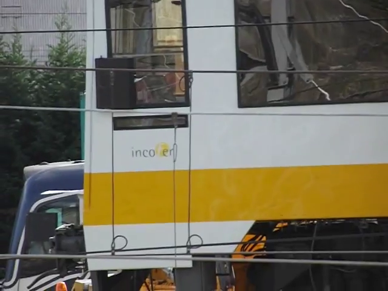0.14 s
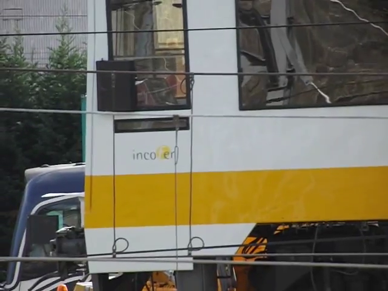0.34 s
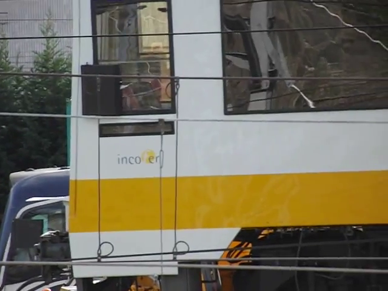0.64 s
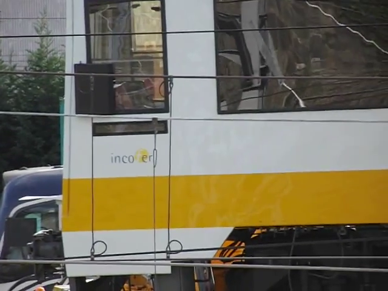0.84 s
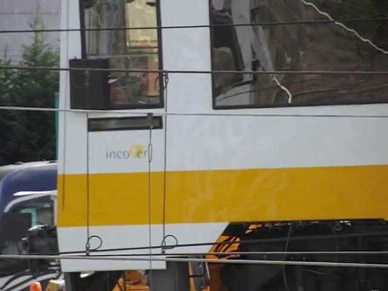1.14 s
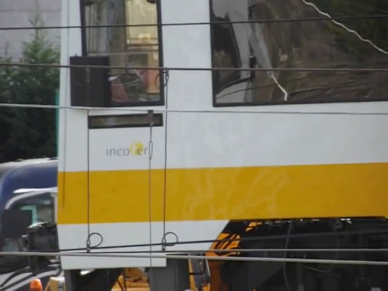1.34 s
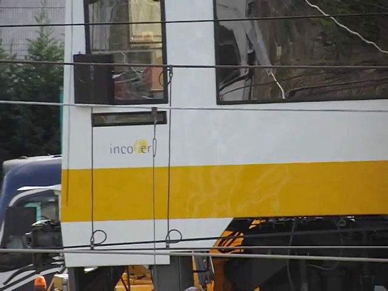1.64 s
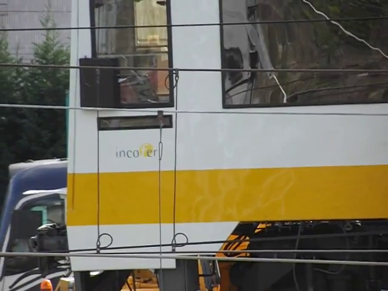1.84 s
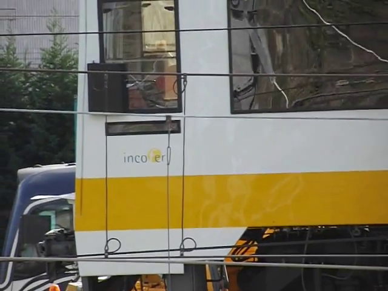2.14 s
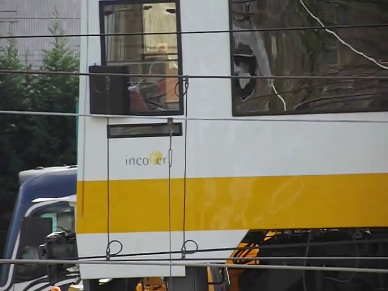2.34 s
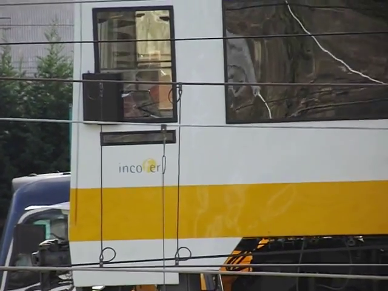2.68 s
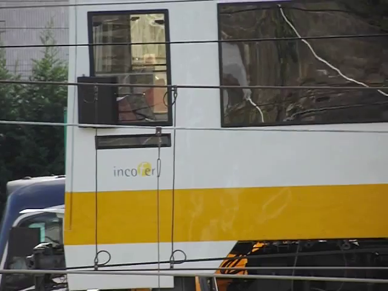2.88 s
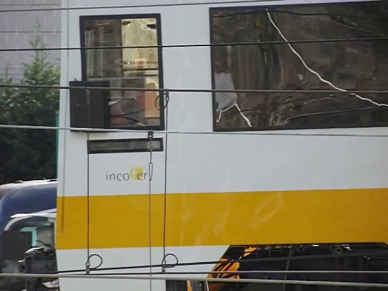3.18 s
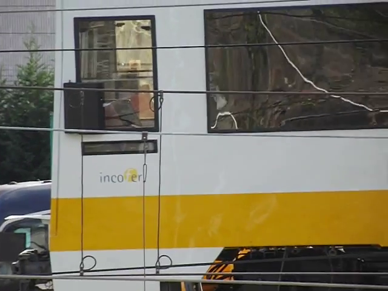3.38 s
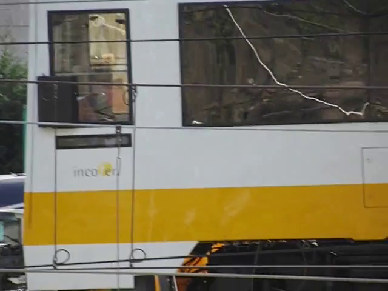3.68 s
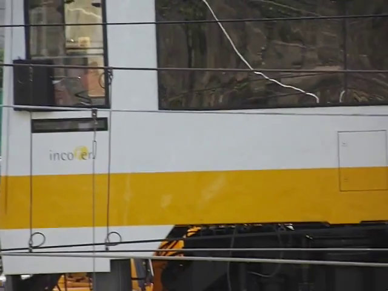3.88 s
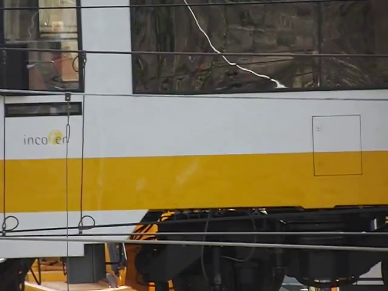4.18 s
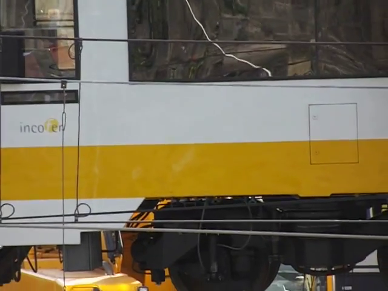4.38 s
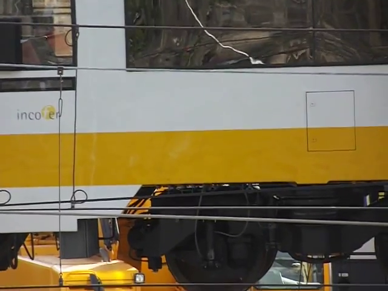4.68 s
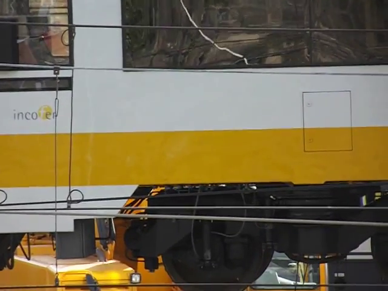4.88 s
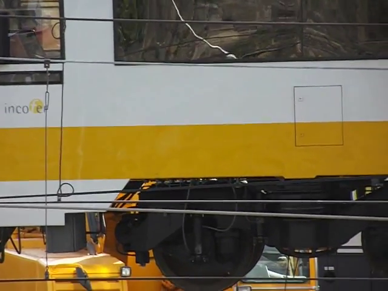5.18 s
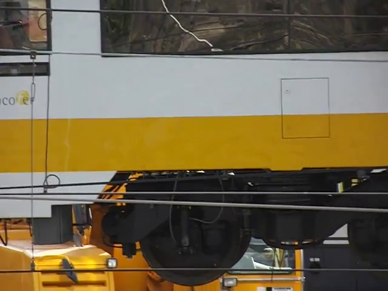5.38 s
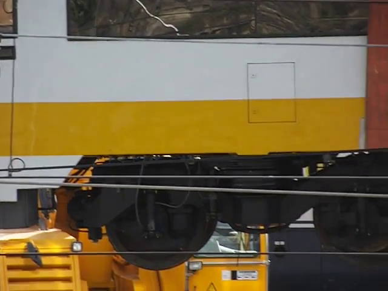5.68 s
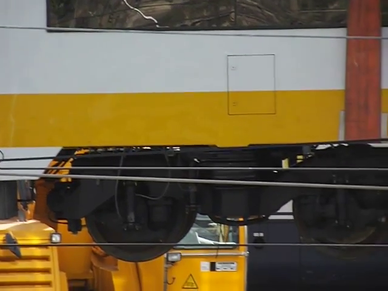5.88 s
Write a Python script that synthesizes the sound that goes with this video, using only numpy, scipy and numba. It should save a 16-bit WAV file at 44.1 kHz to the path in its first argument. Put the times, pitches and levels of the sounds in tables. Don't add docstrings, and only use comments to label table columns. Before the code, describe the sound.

A heavy diesel crane engine roars steadily outdoors while wind thumps the microphone, small metal rattles, then steel scrapes and groans in waves.

```python
import sys
import numpy as np
from scipy import signal
from scipy.fft import rfft, irfft
from scipy.io import wavfile
from scipy.ndimage import uniform_filter1d
from numba import njit

SR = 44100
rng = np.random.default_rng(int(sys.argv[2]) if len(sys.argv) > 2 else 0)


def int16_out(signal):
    q = np.round(np.clip(np.atleast_2d(signal).T, -1, 1) * 32767)
    wavfile.write(sys.argv[1], SR, q.astype(np.int16))


def ratio(d):
    e = np.asarray(d, float) / 20
    return 10 ** e


N = 265482
T = np.arange(N) / SR

FIRING_HZ, FIRING_DB = 38.5, -39
ROAR_DB = -31.5
DRAG_MASK_DB = -38.5
YARD_T60_S, YARD_DB = 0.61, -10

# multiple_of_firing_rate [1], level_db [dB re FIRING_DB]
EXHAUST_HARMONICS = [
    (1, 3),
    (2, -13),
    (6, -19),
    (7, -9.5),
]
# start_s [s], piston_rate_hz [Hz], level_db [dB]
PUMP_COURSE = [
    (0, 178.4, -38),
    (1, 178, -37.5),
    (2.2, 176.5, -38.5),
    (3.1, 174.9, -42),
    (4, 174.4, -40.5),
    (4.7, 170, -43.5),
    (5.4, 170, -48.5),
    (6.02, 171.5, -39.5),
]
# frequency_hz [Hz], density_db [dB per Hz]
ROAR_SPECTRUM = [(50, -1), (120, -5.5), (220, -3), (400, -7), (470, -10), (580, -13.5), (700, -10.5),
                 (1250, -12.5), (2000, -17), (2500, -14.5), (3200, -17), (4000, -18.5), (5000, -31.5),
                 (7000, -51.5)]
# pitch_hz [Hz], width_hz [Hz], level_db [dB]
PANEL_MODES = [(856, 210, -41), (1028, 255, -43.5), (2750, 220, -45), (2805, 20, -54.5), (3604, 200, -50),
               (340.3, 25, -50)]
# start_s [s], panel_level_db [dB]
ENGINE_LOAD = [(0, -3.5), (.5, -0.5), (1.0, 3.5), (1.4, 3.5), (1.8, -1.5), (2.5, 2.5), (3.0, -0.5),
               (4.2, 1), (4.7, -1.5), (5.1, 4), (5.6, 3), (6.02, 1.5)]
# start_s [s], level_db [dB, with the roar], brightness_db [dB per octave]
DRAG_COURSE = [(1.9, -46.5, 6), (1.94, -33, -3.5), (1.99, -42, 7), (2.01, -30.5, -5), (2.03, -35.5, -1.5),
               (2.22, -41.5, 0), (2.24, -37, -1), (2.7, -34.5, 1), (2.71, -38, -2), (2.86, -37.5, 7),
               (2.95, -38, -1), (3.1, -32, -1.5), (3.39, -35.5, 2.5), (3.49, -36, -1.5), (3.52, -51.5, 6),
               (3.53, -38, 0.5), (3.87, -31, -1.5), (3.9, -37, 2), (3.99, -34, -1), (4.18, -39.5, 3),
               (4.19, -38.5, 3), (4.22, -48.5, 4), (4.3, -42, 3), (4.33, -51, -5), (4.38, -43, -1),
               (4.47, -51, 0), (4.48, -46, 2), (4.75, -44, 0), (4.78, -40, -3), (4.8, -48, -5),
               (4.83, -38, 0), (4.86, -50, 0), (4.88, -35, -4), (4.89, -49, -4), (4.95, -39, 5),
               (5.01, -41.5, 2.5), (5.23, -32, -2.5), (5.56, -39, -1), (5.57, -50, 0), (5.59, -44.5, 0),
               (5.8, -39, -1), (5.81, -37, -5), (5.85, -30.5, -1), (5.92, -31, -4), (6.02, -30.5, 2)]
# pitch_hz [Hz], width_hz [Hz], level_db [dB]
BEAM_MODES = [(330, 90, -5.5), (430.5, 60, -3), (877, 220, 3), (1786, 90, -7.5), (1684, 360, 0.5),
              (2330, 300, 2), (3000, 330, 1.5), (3404, 170, 1.5), (3643, 290, 2.5), (4380, 370, -9.5)]
# start_s [s], level_db [dB], length_s [s], pitch_hz [Hz]
SHACKLE_RATTLES = [(0.256, -45, .015, 2750), (0.667, -42.5, 0.02, 2720), (0.806, -40, 0.025, 2820),
                   (0.91, -41.5, .02, 3000), (1.108, -37.5, 0.025, 2610), (1.119, -39.5, .028, 3000),
                   (1.231, -41, 0.014, 2780), (1.343, -37.5, 0.014, 2530), (1.354, -38, .024, 2850),
                   (1.54, -47.5, 0.026, 2750), (1.812, -41, .013, 2910), (1.926, -46, 0.023, 2870)]
# start_s [s], level_db [dB], buffeting_reach_hz [Hz]
WIND_COURSE = [(0.0, -35, 90), (0.08, -31, 90), (0.12, -38, 90), (0.15, -21, 89.6), (0.18, -32, 91),
               (0.23, -28.5, 90.5), (0.28, -29.5, 90), (0.35, -26, 90), (0.45, -36, 90), (0.53, -26.5, 90),
               (0.62, -39, 90), (0.69, -26, 90), (0.77, -31, 90), (0.82, -17, 90), (0.89, -33, 90),
               (0.97, -27, 90), (1.02, -40.5, 90), (1.79, -31.5, 90), (1.83, -42, 89), (1.91, -29, 90),
               (2.16, -43.5, 90), (2.31, -35.5, 90), (2.58, -46, 90), (2.92, -35, 91), (3.47, -36.5, 90),
               (3.69, -36.5, 89.5), (3.79, -45.5, 89), (3.84, -32, 90), (3.91, -40, 90), (3.94, -36.5, 89),
               (4.44, -44, 90), (4.48, -48, 90), (4.54, -42, 90), (4.79, -33, 89), (4.88, -26.5, 91),
               (4.93, -37, 90), (5.06, -37.5, 90), (5.13, -26.5, 89.5), (5.2, -36.5, 90), (5.53, -38, 90),
               (5.58, -28.5, 90), (5.65, -35, 89), (5.72, -32, 90), (5.75, -24, 90), (5.83, -35.5, 90),
               (6.02, -36.5, 90)]
# centre_s [s], peak_db [dB], width_ms [ms], push [1, negative pulls]
EDDY_POPS = [(.105, -15, 5.4, -0.83), (0.1285, -9, 3, -1.07), (0.1323, -10, 4.7, 1), (0.1435, -17, 6, 1),
             (0.2306, -13.5, 4, -0.92), (.2989, -18, 6.5, 0.83), (0.3424, -12, 4.6, -1),
             (0.3495, -1, 3.4, -1.04), (.3643, -13, 7.2, 1), (.3874, -22, 8, -0.9), (0.43, -15, 5.1, 1),
             (.534, -19, 7, -1), (0.698, -11.5, 8, 0.89), (0.741, -15.5, 9.2, -1),
             (0.8212, -11.5, 7.2, 0.91), (0.8258, -10, 5.1, -1.2), (0.9143, -16, 6.5, 1),
             (4.181, -20, 15, 0.97), (5.1214, -16, 9.6, 1), (5.135, -19, 4, -1), (5.7066, -19, 3.2, 1),
             (5.717, -10, 13.4, 0.76), (5.7301, -16, 7.9, -1), (5.7385, -10, 3.7, -1.1),
             (5.747, -13, 5.9, 0.8)]


def unit(x):
    return x / np.sqrt(np.mean(x ** 2))


def curves(table):
    s, *columns = np.transpose(table)
    return [np.interp(T, s, column) for column in columns]


@njit
def band_pass(x, hz, width_hz):
    y, band, low = np.empty(len(x)), 0., 0.
    g, damping = np.tan(np.pi * hz / SR), width_hz / hz
    for i in range(len(x)):
        v = (band + g * (x[i] - low)) / (1 + g * (g + damping))
        band = 2 * v - band
        low += 2 * g * v
        y[i] = damping * v
    return y


def ring(x, hz, width_hz):
    once = band_pass(x, 1. * hz, 1. * width_hz)
    return unit(band_pass(once, 1. * hz, 1. * width_hz))


def noise():
    return rng.standard_normal(N)


def walk(rate_hz):
    hold = int(SR / rate_hz)
    steps = np.repeat(rng.standard_normal(N // hold + 1), hold)
    slewed = uniform_filter1d(uniform_filter1d(steps, hold), hold)
    return unit(slewed[:N])


def contacts(rate_hz, scatter_db):
    chance = rng.random((3, N))
    struck = chance[0] < rate_hz / SR
    sign = np.sign(chance[1] - .5)
    return struck * sign * ratio(-scatter_db * np.log(1 - chance[2]))


def engine():
    phase = 2 * np.pi * np.cumsum(FIRING_HZ * (1 + .006 * walk(4))) / SR
    exhaust = np.zeros(N)
    for multiple, db in EXHAUST_HARMONICS:
        exhaust += ratio(FIRING_DB + db + 1.1 * walk(4.4)) * np.sqrt(2) * np.sin(multiple * phase)

    hz, density_db = np.transpose(ROAR_SPECTRUM)
    bins_hz = np.maximum(np.fft.rfftfreq(N, 1 / SR), 1)
    colour = ratio(np.interp(np.log(bins_hz), np.log(hz), density_db))
    roar = unit(irfft(rfft(noise()) * colour, N)) * ratio(ROAR_DB + 0.39 * walk(2.7))

    load_db, = curves(ENGINE_LOAD)
    panels = np.zeros(N)
    for hz, width_hz, db in PANEL_MODES:
        panels += ratio(db + 0.73 * walk(6)) * ring(noise(), hz, width_hz)
    throb = 1 + 0.11 * np.cos(phase)
    return exhaust + throb * (roar + ratio(load_db) * panels)


def pump():
    hz, db = curves(PUMP_COURSE)
    phase = 2 * np.pi * np.cumsum(hz * (1 + .003 * walk(8))) / SR
    hum = np.sin(phase) + ratio(-18.5) * np.sin(2 * phase)
    return np.sqrt(2) * ratio(db + 1.5 * walk(9)) * hum


def drag():
    db, brightness_db = curves(DRAG_COURSE)
    excess_power = np.maximum(ratio(2 * db) - ratio(2 * DRAG_MASK_DB), 0)
    gain = np.sqrt(excess_power) * (T > DRAG_COURSE[0][0])
    slips = contacts(2500, scatter_db=2.0) * ratio(2.0 * walk(30))
    beam = np.zeros(N)
    for hz, width_hz, mode_db in BEAM_MODES:
        tilt_db = brightness_db * np.log2(hz / 1700)
        beam += ratio(mode_db + 2.0 * walk(7) + tilt_db) * ring(slips, hz, width_hz)
    return gain * beam * ratio(-6.5)


def rattles():
    out, taps = np.zeros(N), contacts(1500, scatter_db=3.5)
    for start_s, db, length_s, hz in SHACKLE_RATTLES:
        i, n = int(start_s * SR), int((length_s + .02) * SR)
        t = np.arange(n) / SR
        rise = np.clip(t / 0.0025, 0, 1)
        fall = np.clip((length_s - t) / 0.0035, 0, 1)
        run = taps[i:i + n] * rise * fall
        narrow = .5 * ring(run, .93 * hz, 120) + .5 * ring(run, 1.15 * hz, 120)
        out[i:i + n] += ratio(db) * (ring(run, hz, 900) + narrow)
    return out


def wind():
    db, reach_hz = curves(WIND_COURSE)
    deep, high = ring(noise(), 28, 45), ring(noise(), 85, 110)
    out = ratio(db - 3.5 + 2.2 * walk(14)) * (1.17 * deep + reach_hz / 130 * high)
    for centre_s, peak_db, width_ms, push in EDDY_POPS:
        i = int(centre_s * SR) + np.arange(-2000, 2000)
        u = (T[i] - centre_s) / (width_ms / 2000)
        pop = 1.26 * np.exp(-u ** 2) - .25 * np.exp(-(u / 2.3) ** 2)
        out[i] += push * ratio(peak_db) * pop
    return out


def yard(x):
    t = np.arange(int(.6 * SR)) / SR
    decay = ratio(-60 * t / YARD_T60_S) * (t > .012)
    echo = rng.standard_normal(len(t)) * decay
    echo /= np.sqrt(np.sum(echo ** 2))
    return x + ratio(YARD_DB) * signal.fftconvolve(x, echo)[:N]


def scene():
    return (engine() + pump() + yard(drag() + rattles()) + wind())[None]


def top_cut(x):
    return signal.sosfilt(signal.butter(12, 7150, fs=SR, output="sos"), x)


def record(dry):
    low_pass = signal.butter(6, 6400, fs=SR, output="sos")
    mix = signal.sosfilt(low_pass, dry) - .004
    return top_cut(mix)


dry = scene()
out = record(dry)
int16_out(out)
```